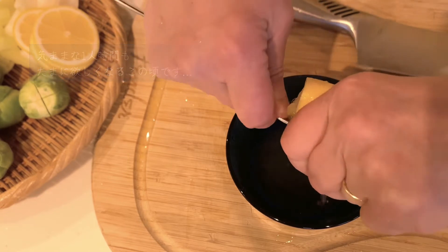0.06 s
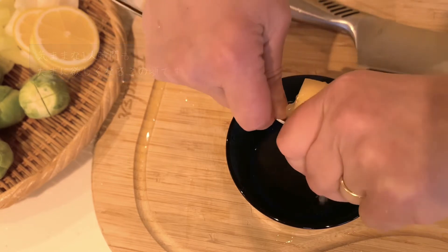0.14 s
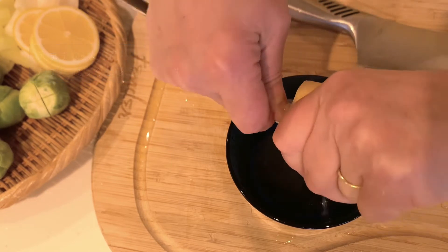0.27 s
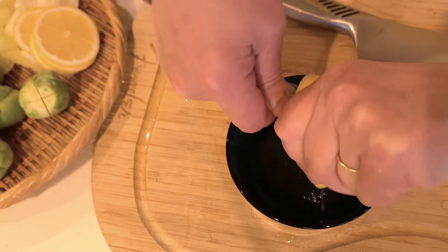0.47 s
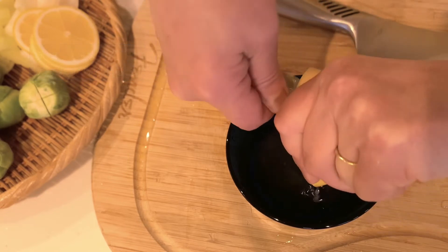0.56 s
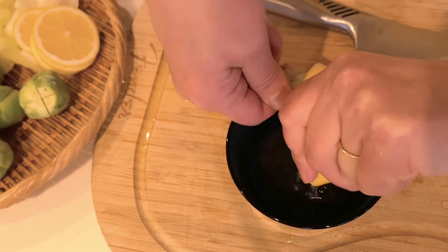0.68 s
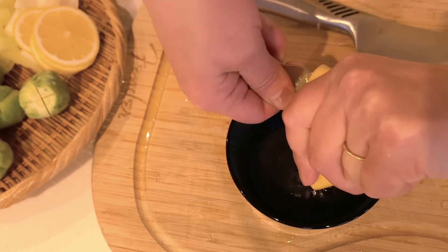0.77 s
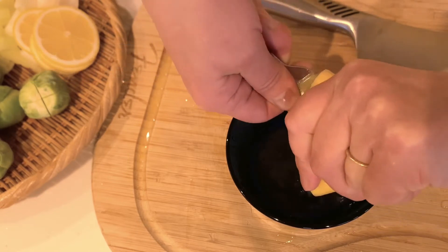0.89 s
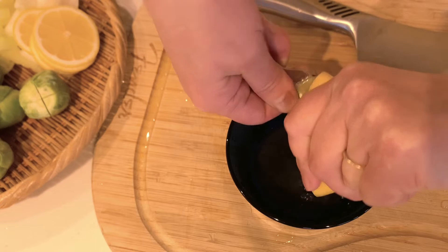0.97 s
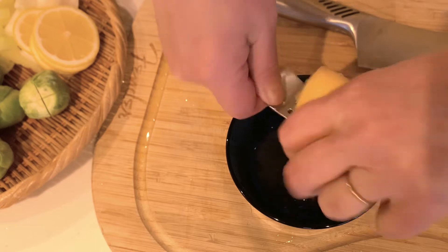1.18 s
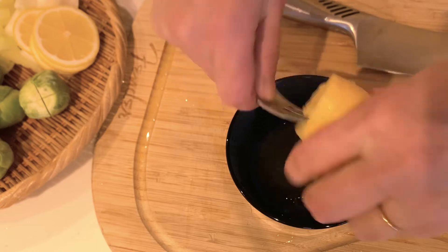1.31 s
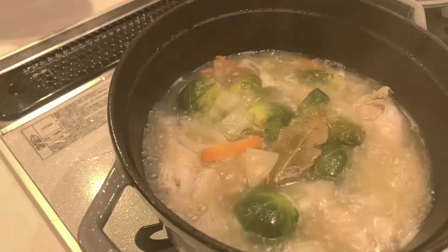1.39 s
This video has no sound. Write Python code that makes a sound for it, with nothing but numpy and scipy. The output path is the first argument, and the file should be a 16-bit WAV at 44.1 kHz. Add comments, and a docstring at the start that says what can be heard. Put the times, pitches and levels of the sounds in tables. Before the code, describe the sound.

A lemon wedge is squeezed close by, with soft wet crackling from the start. At 0.2 seconds a metal utensil knocks the bowl once, short and damped. From 0.4 to 0.9 seconds come small squishes, juicy snaps and tiny drips. After a brief lull, another press crackles around 1.1 seconds and fades by 1.4. A faint appliance hum and low rumble run underneath in the quiet kitchen.

```python
"""A lemon wedge is squeezed against a metal utensil over a small bowl in a quiet kitchen.
With each press the flesh squelches and crackles, juice sacs snap and tiny air bubbles ring.
Near the start the utensil knocks the bowl once, its ring cut short by the hand holding it.
The room echoes briefly over an appliance's hum and a low rumble."""
import sys
import numpy as np
from scipy import signal
from scipy.fft import rfft, irfft, next_fast_len
from scipy.io import wavfile

SR = 44100
rng = np.random.default_rng(int(sys.argv[2]) if len(sys.argv) > 2 else 0)


def transcribe(u):
    """Save the signal u as a 16-bit wav file named by the first command-line argument.

    u: samples, shape (n,) or (channels, n), limited to [-1, 1]; the rate is SR.
    q: integer samples, one column per channel.
    """
    v = np.clip(np.atleast_2d(u).T, -1, 1)
    q = np.round(v * 32767).astype(np.int16)
    wavfile.write(sys.argv[1], SR, q)


N = 63945
TOP_HZ = 15750  # upper limit of the treble


def undb(db):
    """Turn decibels into a number to multiply by."""
    return 10 ** (np.asarray(db) / 20)


def colour(x, points):
    """Shape the tone of x along (Hz, dB) points; white noise keeps its overall power."""
    size = 2 * next_fast_len(len(x))
    hz, db = np.array(points).T
    bin_hz = np.arange(size // 2 + 1) * SR / size
    gain = undb(np.interp(np.log(bin_hz + 1), np.log(hz), db))
    cepstrum = irfft(np.log(gain / np.sqrt(np.mean(gain ** 2))))
    # folding this in half keeps the filter from sounding before its input
    cepstrum[1:size // 2] *= 2
    cepstrum[size // 2 + 1:] = 0
    return irfft(rfft(x, size) * np.exp(rfft(cepstrum)))[:len(x)]


def clock(size):
    """The time of each sample in seconds."""
    return np.arange(size) / SR


def add(out, at, x):
    """Mix x into out at a time in seconds."""
    i = min(max(int(at * SR), 0), len(out))
    out[i:i + len(x)] += x[:len(out) - i]


def ring(modes):
    """Add up fading tones; each one's ring time is how long it takes to drop 60 dB."""
    t = clock(N // 2)
    return sum(undb(db - 60 * t / ring_s) * np.sin(2 * np.pi * hz * t) for hz, db, ring_s in modes)


def ping(hz, decay_s, rise_s=0.000096, glide=0):
    """A small air pocket rings; glide is the share of pitch it gains per decay time."""
    t = clock(2048)
    pitch = hz * (1 + glide * np.minimum(t / decay_s, 10))
    attack = 1 - np.exp(-(t / rise_s) ** 2)
    fade = np.exp(-np.maximum(t - rise_s, 0) / decay_s)
    return attack * fade * np.sin(2 * np.pi * np.cumsum(pitch) / SR)


# The tone of the rumble and hiss. Each row: frequency in Hz, relative level in dB.
RUMBLE_TONE = [(15, -25), (30, -8), (55, -5), (80, 4.5), (95, -4.5), (110, -3.5), (160, -12.5),
               (250, -19.5), (500, -26), (1000, -30.5), (3000, -36), (8000, -37), (16000, -39.5)]

def background(mains_hz=59.27, hum_db=-46, overtone_db=-65, rumble_db=-51.5):
    """An appliance hums at mains frequency over rumble and faint hiss."""
    phase = 2 * np.pi * mains_hz * clock(N)
    hum = np.sqrt(2) * (undb(hum_db) * np.sin(phase) + undb(overtone_db) * np.sin(2 * phase))
    return hum + undb(rumble_db) * colour(rng.standard_normal(N), RUMBLE_TONE)


# Soft squelches. Each row: start in seconds, length in seconds, level in dB.
SQUELCHES = [(.0, 0.049, -58), (0.44, 0.036, -59.5), (0.567, 0.06, -57), (0.732, 0.036, -55.5),
             (0.778, 0.031, -56), (1.059, 0.034, -55), (1.101, 0.045, -53)]
# Their tone. Each row: frequency in Hz, relative level in dB.
SQUELCH_TONE = [(150, -9.5), (700, -0.5), (1050, -12), (1350, 8.5), (1650, -8), (2500, 6), (4000, -1.5),
                (6000, -6.5), (7500, -9), (16000, -14)]

def squelches(ticks_per_s=2500, spread_db=6):
    """Crushed flesh gives way in dense swells of soft ticks."""
    t = clock(N)
    ticks = (rng.random(N) < ticks_per_s / SR) * np.sign(rng.standard_normal(N))
    ticks *= undb(spread_db * rng.standard_normal(N))
    swell = sum(undb(db) * np.sin(np.pi * np.clip((t - at) / length, 0, 1))
                for at, length, db in SQUELCHES)
    return colour(swell * ticks / ticks.std(), SQUELCH_TONE)


# How the hand's pressing drives the crackle. Each row: time in seconds, level change in dB.
HAND_PRESS = [(0, -2.5), (.1, -4), (.19, -5.5), (.36, -8), (.45, -1), (.55, -6.5), (.62, -0.5), (.76, -0.5),
              (.87, -8), (1.001, -15), (1.06, -4), (1.11, 7.5), (1.16, -2), (1.22, -13), (1.301, -6),
              (1.422, -41.5)]

def crackle(ticks_per_s=600, centre_hz=5220, spread_octaves=1.62, base_db=-53.5, spread_db=4):
    """The flesh makes many tiny wet ticks, louder as the hand presses."""
    out = np.zeros(N)
    for when, softness, up, down in rng.random((int(ticks_per_s * N / SR), 4)):
        hz = min(centre_hz * 2 ** (spread_octaves * (up - down)), TOP_HZ)
        db = base_db - spread_db * np.log(max(softness, .02))
        add(out, when * N / SR, undb(db) * ping(hz, decay_s=0.00037))
    press_db = np.interp(clock(N), *np.array(HAND_PRESS).T)
    return out * undb(press_db)


# Bursting juice sacs. Each row: start in seconds, pitch in Hz, ring level in dB,
# spray level in dB, the spray's treble boost or cut in dB.
SNAPS = [(.0033, 3240, -33.5, -39, -11), (.2695, 7000, -44, -42.5, -8), (.3270, 1400, -45, -49, -10),
         (0.3926, 8000, -38, -49, 0), (.4056, 2560, -33, -42, -11), (0.413, 3130, -30, -26.5, 1),
         (0.4841, 4500, -39, -52, -16), (0.4963, 5800, -42, -55, -7), (.5010, 4130, -29, -44, -8),
         (.5301, 2770, -37.5, -34.5, -17), (0.5761, 6190, -26.5, -30.5, 4), (.5800, 6040, -30.5, -33.5, -3),
         (.6010, 8070, -37.5, -53, 2), (.6080, 2370, -41.5, -42.5, -7), (0.621, 4940, -43, -46, 6),
         (.6684, 2460, -45.5, -50, 1), (0.6865, 4900, -41, -47, 0), (0.7147, 5800, -39.5, -44, -13),
         (.7304, 7970, -35, -41, -6), (0.7427, 2930, -33, -34, -12), (0.751, 7740, -37.5, -47, -1),
         (0.7812, 3620, -41, -47, 8), (0.7841, 3596, -36, -47, 2), (0.7987, 3270, -41, -43, -7),
         (.8310, 3300, -46, -57, -8), (0.8475, 6050, -36.5, -41, 0.5), (.8540, 3560, -39, -46, 8),
         (0.8932, 3550, -34, -40, 6), (0.9176, 13400, -35.5, -50, 12), (1.0358, 14000, -38.5, -42, 18),
         (1.0425, 6030, -38, -55, 4), (1.0740, 2640, -37, -64, -26), (1.1206, 3600, -35, -52, -10),
         (1.1239, 2120, -37.5, -49, -19), (1.1314, 5960, -41, -46, -10), (1.1552, 5900, -29, -49.5, 9),
         (1.1718, 11100, -34.5, -41.5, 14), (1.1874, 4758, -42, -46, 7), (1.2199, 7902, -46, -49, 2),
         (1.2510, 5000, -42.5, -48.5, 4), (1.257, 3800, -40, -50, -9), (1.3010, 1950, -51, -56, -1)]
# The spray's basic tone. Each row: frequency in Hz, relative level in dB.
SPRAY_TONE = [(150, -20), (600, 5.5), (1400, 1), (2600, 7), (5000, 2), (8000, 0.5), (12000, -4.5),
              (16000, -4)]

def snaps(spray_decay_s=0.0013, treble_hz=(4580, 10000), bass_db_per_octave=6.5):
    """Juice sacs burst: a very short ring with a spit of spray, dull or bright."""
    out, t = np.zeros(N), clock(2048)
    for at, hz, ring_db, spray_db, treble_db in SNAPS:
        tone = []
        for band_hz, db in SPRAY_TONE:
            treble = np.interp(band_hz, treble_hz, [0, treble_db])
            # small, high-pitched sacs throw little bass
            bass = bass_db_per_octave * min(np.log2(band_hz / (0.36 * hz)), 0)
            tone.append((band_hz, db + treble + bass))
        spray = colour(rng.standard_normal(len(t)) * np.exp(-t / spray_decay_s), tone)
        add(out, at, undb(ring_db) * ping(hz, decay_s=0.00065) + undb(spray_db) * spray)
    return out


# Bubbles and drips. Each row: start in seconds, starting pitch in Hz, level in dB, decay in seconds.
BUBBLES = [(0.0396, 3160, -37.5, 0.0027), (0.2703, 6550, -38, .0014), (0.5016, 3240, -35, 0.002),
           (.6225, 4975, -25, 0.0016), (.6429, 3930, -45, 0.0015), (0.6858, 8600, -40.5, 0.0014),
           (.6866, 4930, -40, .0016), (.7643, 4800, -47, 0.0014), (.7771, 6100, -42, .0016),
           (0.7915, 7380, -42, 0.0018), (0.8389, 3180, -39, 0.0024), (0.8494, 3184, -34.5, 0.0018),
           (.8535, 3504, -37, 0.0028), (0.8928, 2924, -32.5, 0.0025), (.8950, 2620, -31, 0.0019),
           (0.899, 2700, -38, 0.0092), (0.9103, 2680, -44, 0.0026), (0.9495, 3200, -41.5, .003),
           (.9502, 4780, -45, 0.0012), (1.042, 3680, -39.5, 0.0014), (1.1200, 6000, -41, .0013),
           (1.1714, 3960, -41, .0014), (1.09, 4840, -48, 0.0021), (1.0993, 4620, -33.5, 0.0011),
           (1.1073, 5850, -33.5, 0.0012), (1.1480, 6070, -41, 0.0015), (1.1919, 4700, -43.5, 0.0013),
           (1.282, 5300, -47.5, 0.0012), (1.365, 4024, -50.5, 0.0017)]

def bubbles():
    """Air caught in the juice rings briefly, rising in pitch as it fades."""
    out = np.zeros(N)
    for at, hz, db, decay_s in BUBBLES:
        add(out, at, undb(db) * ping(hz, decay_s, rise_s=0.00062, glide=.012))
    return out


# The ringing tones of the hand-held utensil, the bowl and the cutting board under it.
# Each row: pitch in Hz, relative level in dB, ring time in seconds.
UTENSIL_TONES = [(1416, -12.5, 0.019), (2060, -19.5, 0.021), (2530, -12.5, 0.013), (2890, -5, 0.0084),
                 (3265, 4, 0.0088), (3820, -4.5, 0.011), (4250, -18, .009), (5490, -18.5, 0.012),
                 (6170, -7, 0.0061), (7760, -11, 0.01), (8160, -10, 0.0099), (10130, -22, 0.0064),
                 (11730, -10.5, 0.0048)]
BOWL_TONES = [(2430, -6, 0.17), (2680, 0, 0.11), (3350, -9, 0.18), (3722, -3.5, 0.24), (3803, -4, 0.38),
              (7405, -1, 0.064), (7870, 5, 0.094), (7910, 7, 0.069), (8060, 5.5, .08)]
BOARD_TONES = [(194, -6.5, 0.02), (341, -3.5, 0.0164), (635, -0.5, 0.023)]
# The tone of the contact click. Each row: frequency in Hz, relative level in dB.
CLICK_TONE = [(80, -11.5), (300, -0.5), (800, -3), (1100, -6), (2400, 8), (3800, 13.5), (4700, 1.5),
              (7800, 4.5), (11000, 2.5), (16000, -4)]

def knock(at=.2016, contact_s=0.00027, board_delay_s=.0018, bounce_s=.0015, crack_decay_s=0.0018):
    """Metal hits the bowl and bounces once; returns the close sound and the sound sent into the room."""
    body, click, t = np.zeros(N), np.zeros(N), clock(N // 2)
    ringing = undb(-7) * ring(UTENSIL_TONES) + undb(-41.5) * ring(BOWL_TONES)
    add(body, at, ringing * (1 - np.exp(-t / contact_s)))
    add(click, at, colour(signal.unit_impulse(len(t)), CLICK_TONE))
    close = body + undb(1) * click
    # the bowl passes the blow on to the board
    add(close, at + board_delay_s, undb(-27) * ring(BOARD_TONES))
    # the utensil touches again: a softer click and a crack of noise
    add(close, bounce_s, undb(-5.5) * click)
    crack = rng.standard_normal(len(t)) * np.exp(-t / crack_decay_s)
    add(close, at + bounce_s, undb(-23) * colour(crack, CLICK_TONE))
    return close, undb(-10.5) * body + undb(6.5) * click


# The air ringing inside the bowl. Each row: pitch in Hz, level in dB, ring time in seconds.
BOWL_HOLLOW = [(1377, -51, 0.066), (2680, -59, 0.053), (5960, -48.5, 0.051)]
# The tone of the room's echo. Each row: frequency in Hz, relative level in dB.
ROOM_TONE = [(100, 1), (600, 0), (1300, 6), (2500, -2), (3900, -1), (4700, 1), (8000, -0.5), (16000, 3)]

def kitchen_echo(low_ring_s=0.58, high_ring_s=0.15, split_hz=5000, build_s=0.0025, early_s=0.0035):
    """How the bowl's hollow, nearby surfaces and the room answer a click; the treble dies first."""
    t = clock(N // 2)
    noise, treble_noise = rng.standard_normal((2, len(t)))
    low = signal.sosfilt(signal.butter(2, split_hz, fs=SR, output="sos"), noise)
    high = signal.sosfilt(signal.butter(2, split_hz, "high", fs=SR, output="sos"), treble_noise)
    tail = low * undb(-60 * t / low_ring_s) + high * undb(-60 * t / high_ring_s)
    tail *= 1 - np.exp(-(t / build_s) ** 2)
    tail = colour(tail / np.linalg.norm(tail), ROOM_TONE)
    early = noise * t * np.exp(-2 * t / early_s)
    return undb(-14) * tail + undb(-12) * early / np.linalg.norm(early) + ring(BOWL_HOLLOW)


def scene(wall_delay_s=.0093, wall_db=-20.5):
    """The squeeze and the knock heard up close, with one near wall and the room behind."""
    room, hum_and_rumble = kitchen_echo(), background()
    knock_close, knock_to_room = knock()
    lemon = snaps() + bubbles() + squelches() + crackle()
    close = lemon + knock_close
    echo = signal.fftconvolve(lemon + knock_to_room, room)[:N]
    out = close + echo + hum_and_rumble
    add(out, wall_delay_s, undb(wall_db) * close)
    return out[None]


def record(dry):
    """A steep filter cuts off the highest treble."""
    return signal.sosfilt(signal.ellip(10, .2, 80, TOP_HZ, fs=SR, output="sos"), dry)


dry = scene()
out = record(dry)
transcribe(out)
```